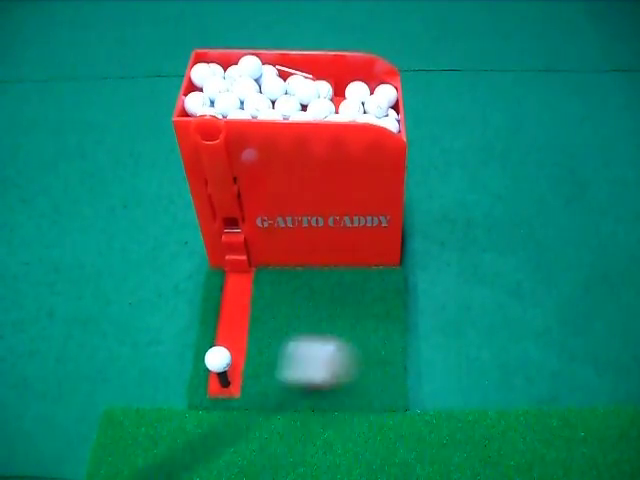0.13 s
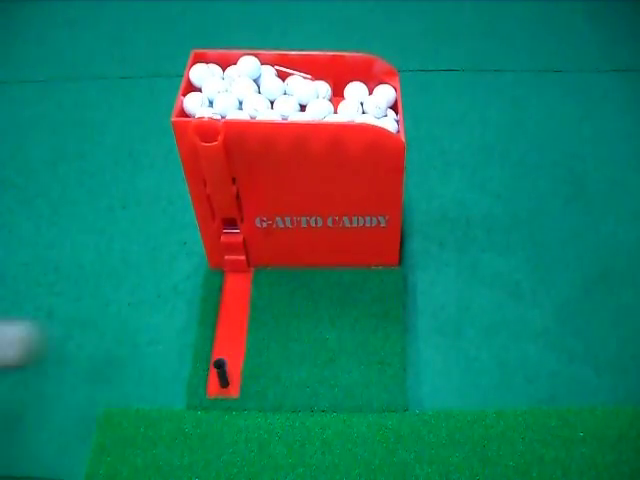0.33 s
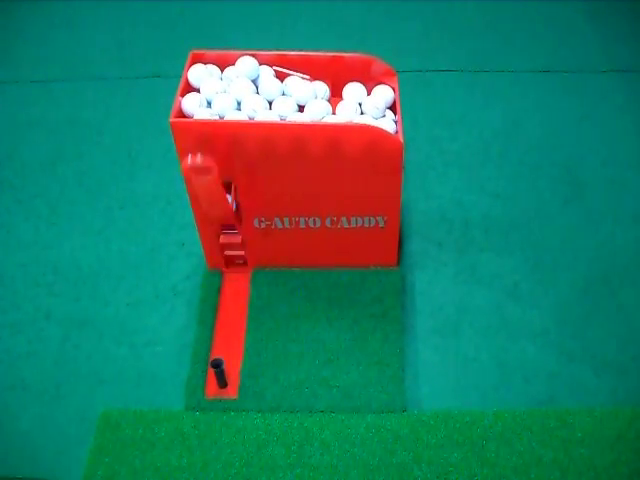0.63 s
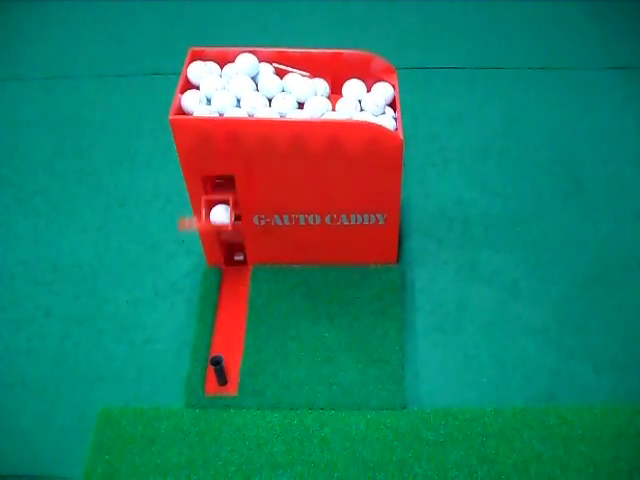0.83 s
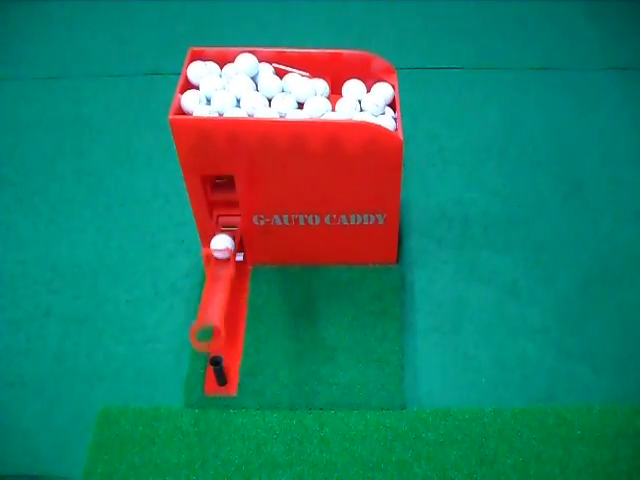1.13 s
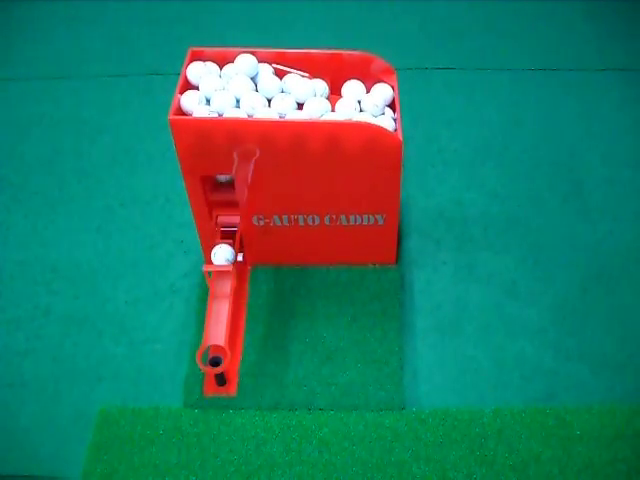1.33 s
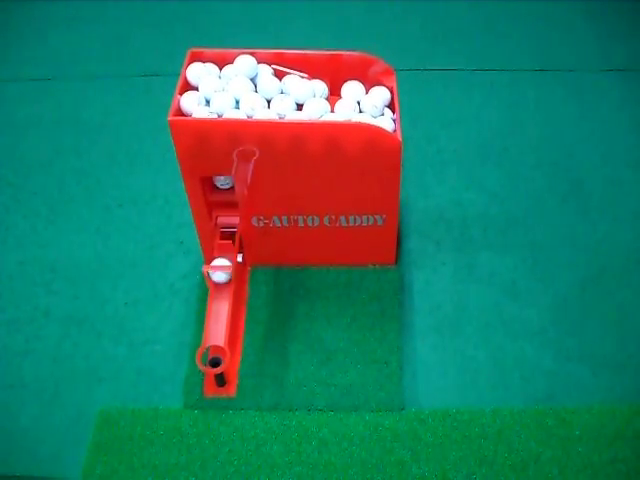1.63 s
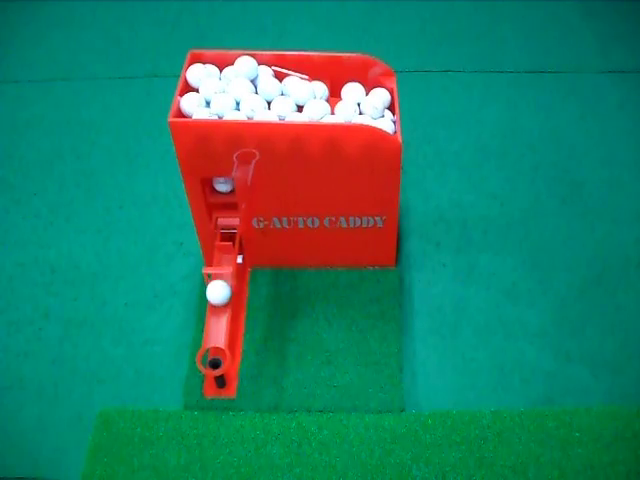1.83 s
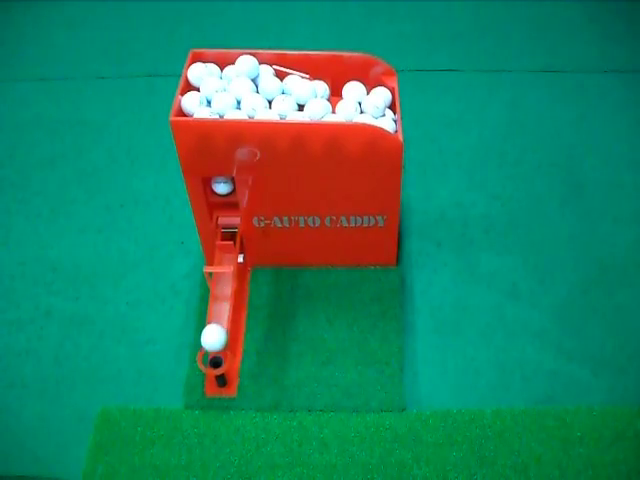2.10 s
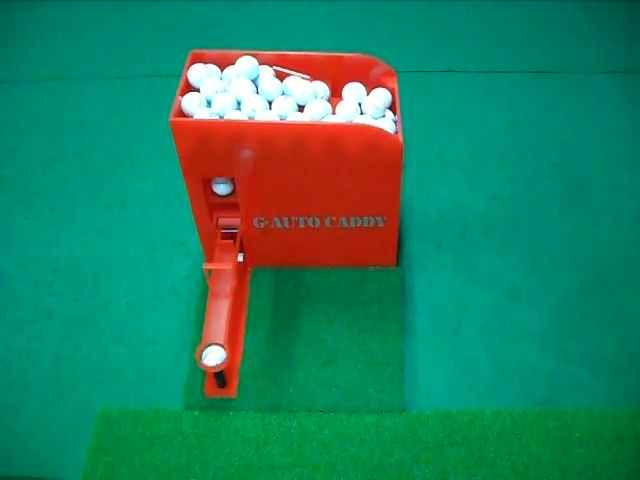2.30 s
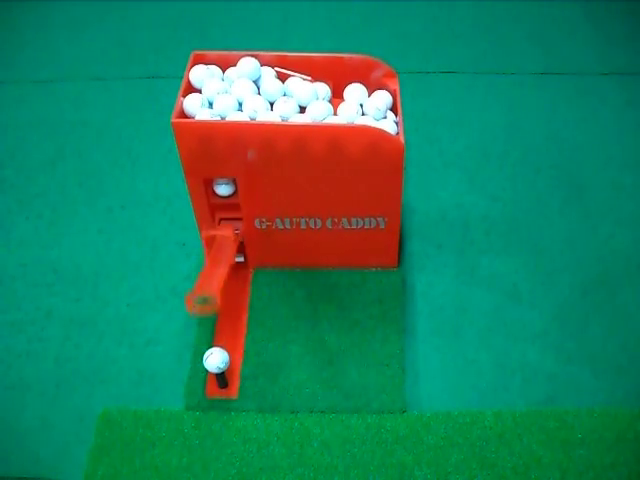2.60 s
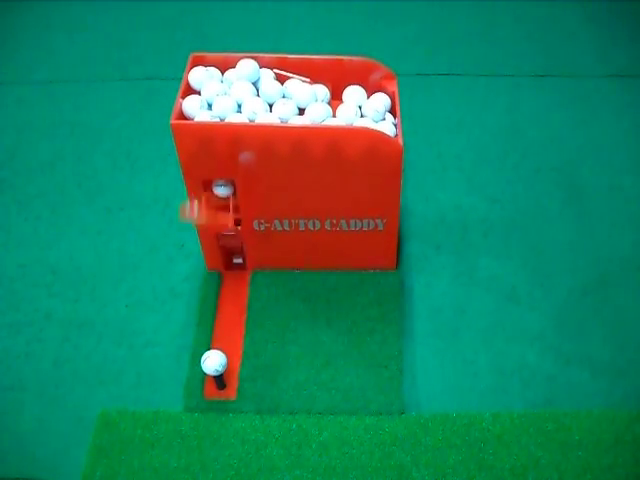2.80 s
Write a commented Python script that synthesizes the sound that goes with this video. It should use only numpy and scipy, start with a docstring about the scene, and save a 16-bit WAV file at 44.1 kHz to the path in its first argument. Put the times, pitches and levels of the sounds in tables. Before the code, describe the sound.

In an echoing practice bay, a metal driver hits a golf ball, which slaps dully into cloth. A dispenser's plastic arm unlatches and clatters down, a ball rolls and clicks onto the tee, and the arm knocks back.

```python
"""A reverberant golf practice bay. A metal driver cracks the ball off the tee, its hollow head pings,
and the ball thuds into a hanging screen. A plastic dispenser unlatches and lowers its arm; a ball
clatters in, rolls down and drops on the tee, and the arm swings back. The hollow housing booms
under the knocks. One sharp tick comes at the end, and faint air noise lies below it all."""
import sys
import numpy as np
from scipy import signal
from scipy.fft import rfft, irfft
from scipy.io import wavfile

SR = 44100
rng = np.random.default_rng(int(sys.argv[2]) if len(sys.argv) > 2 else 0)


def persist_wave(psi):
    """Save psi, clipped to +-1, as 16-bit WAV."""
    counts = np.round(np.clip(psi, -1, 1) * 32767).astype(np.int16)
    wavfile.write(sys.argv[1], SR, np.atleast_2d(counts).T)


N = 130095
T = np.arange(N) / SR


def club():
    """Metal on ball: a hard crack, its broader wash in the bay, and the ping of the hollow head."""
    # First touch, full hit, two near reflections. Each row: start in seconds, level in dB,
    # scatter in seconds.
    strikes = [(0.207, -46, 0.0089), (0.2098, -37.5, 0.015), (0.218, -43.5, 0.012), (0.235, -49, 0.045)]
    # The crack's colour towards the microphone, then into the bay. Each row: frequency in Hz, gain in dB.
    crack_colour = [(100, -24), (400, -25), (650, -5), (900, -3), (1250, 9), (1560, -2), (1850, 2.5),
                    (2250, -12), (2780, -27), (3250, -3), (3620, 5), (4080, -12), (4600, -5), (5500, -19),
                    (6400, 8), (7200, -22), (7700, -12), (8400, -3), (9000, -17), (12000, -20)]
    bay_colour = [(100, -10), (280, 0.5), (480, 0), (750, 2), (1200, 3.5), (1650, -1.5), (2250, -3),
                  (2780, -16), (3400, -3.5), (4050, -14.5), (4550, -10), (5500, -16), (6400, -3),
                  (7200, -16), (7720, -9), (8200, -13), (9000, -21), (12000, -23)]
    # The head's modes. Each row: pitch in Hz, level in dB, t60 in seconds.
    head_modes = [(1165, -46, .05), (3380, -59, .3), (3456, -58, .3), (3690, -56, .15), (5074, -47, .14),
                  (6308, -50, .45), (6344, -36, .11), (6349, -50, .38), (6565, -53, .12), (6830, -57, .16),
                  (7680, -56, .33)]
    full_hit = strikes[1]
    ping = ringing(head_modes, start=full_hit[0])
    thrown = blows([full_hit], bay_colour)
    wash = in_bay(thrown, wet_db=1.5) - thrown  # the tail alone
    return blows(strikes, crack_colour) + wash + in_bay(ping, wet_db=-12)


def screen():
    """Heavy cloth stops the ball, slaps dully and settles."""
    # The slaps. Each row: start in seconds, level in dB, scatter in seconds.
    thuds = [(0.4008, -32, 0.00033), (0.4102, -37.5, 0.0012), (0.4155, -38, 0.038), (0.4235, -40, 0.033),
             (0.4300, -40.5, 0.062), (0.4385, -39, 0.028), (0.4790, -44.5, 0.026)]
    # The cloth's colour. Each row: frequency in Hz, gain in dB.
    cloth_colour = [(40, -6), (120, -3), (200, 10.5), (290, -0.5), (460, 11.5), (680, 0), (1000, 1.5),
                    (1230, -6), (1450, -22.5), (2000, -22), (3000, -33), (8000, -66)]
    return in_bay(blows(thuds, cloth_colour), wet_db=-4.5)


def arm_knocks():
    """Each contact sets off the plastic's dense, short ring; harder contacts reach higher bands."""
    # Arm and ball knock together. Each row: start in seconds, then body, clack, snap and tick in dB.
    knocks = [(0.688, -56, -55, -60, -80), (0.728, -53.5, -63, -79, -84), (0.76, -54.5, -68, -79, -80),
              (1.134, -41.5, -41, -48, -58), (1.154, -45, -49, -57, -72), (1.179, -45.5, -53, -63, -82),
              (1.23, -42, -66, -63, -80), (1.336, -45.5, -65, -64, -76), (1.366, -45, -55, -67, -84),
              (1.3936, -37, -47, -50.5, -61), (1.427, -50, -48.5, -50.5, -57.5),
              (1.442, -34.5, -45, -52.5, -71), (1.463, -43, -48, -58, -74), (1.4873, -37, -42, -51.5, -72),
              (1.503, -63, -53, -63, -69), (1.534, -46.5, -64, -56.5, -68), (1.606, -65, -79, -76, -78),
              (1.647, -66, -74, -78, -82), (1.931, -56, -77, -63, -67), (2.197, -51, -49, -66, -76),
              (2.2255, -34, -40, -37.5, -59.5), (2.247, -41, -48, -50, -54), (2.268, -60, -65, -46, -56),
              (2.278, -44, -42, -41.5, -54), (2.301, -47, -45, -58, -59), (2.376, -45.5, -57, -65, -72),
              (2.464, -45, -46, -57, -69), (2.522, -43, -54, -59, -72), (2.5417, -33.5, -42, -51.5, -70),
              (2.56, -44, -51.5, -61, -77), (2.592, -37.5, -70, -61, -72), (2.622, -42.5, -51, -57, -76),
              (2.651, -42, -57.5, -72, -70), (2.679, -54, -63, -78, -80)]
    # Those four bands. Each row: low edge in Hz, high edge in Hz.
    bands = [(310, 780), (720, 1500), (1450, 4700), (4700, 10500)]
    # One value a band: attack in seconds, t60 in seconds, reverb send in dB.
    rise_s = [0.0032, 0.0026, 0.00095, 0.00022]
    t60_s = [0.086, 0.099, 0.052, 0.031]
    wet_db = [-6.5, -2.5, -6, -2.5]
    out = 0
    for k, band in enumerate(bands):
        force = sum(from_db(db[k]) * contact(T - start, rise_s[k], t60_s[k]) for start, *db in knocks)
        bandpass = np.vstack([signal.butter(2, band, "band", fs=SR, output="sos")] * 2)
        grain = rng.choice([-1., 1.], N)
        steady = arm_body(signal.sosfilt(bandpass, grain))  # only sets the band's gain
        struck = arm_body(signal.sosfilt(bandpass, grain * force + 1e-18))
        out = out + in_bay(struck / steady.std(), wet_db[k])
    return out


def arm_body(x):
    """Arm and chute resonate on top of what excites them."""
    # Their resonances. Each row: centre in Hz, width in Hz, added level in dB.
    modes = [(317.3, 25, 16.5), (403, 10, 3.5), (454, 12, -13), (518.5, 64, 1.5), (607, 7.2, 2.5),
             (770.5, 51, 2.5), (824, 17, -4.5), (931, 17, 4.5), (1027, 24, -6), (1127, 28, -9.5),
             (1561, 39, -1), (1760, 21, 7), (2450, 600, -4.5), (3230, 86, -1.5), (3830, 71, -4)]
    out = x
    for hz, width_hz, db in modes:
        resonator = signal.iirpeak(hz, hz / width_hz, fs=SR)
        out = out + from_db(db) * signal.lfilter(*resonator, x)
    return out


def housing():
    """The hollow box swells into its low note when knocked, with a short rumble round it."""
    # The booms. Each row: start in seconds, level in dB, pitch in Hz.
    booms = [(0.232, -56.5, 209.5), (0.409, -44, 205), (0.561, -56.5, 196), (0.600, -52, 199.5),
             (0.632, -55.5, 207), (0.669, -39.5, 204.8), (0.720, -48.5, 190), (0.751, -55, 185),
             (1.136, -34, 205.5), (1.174, -44, 218.5), (1.244, -49, 215), (1.336, -39, 209),
             (1.396, -46.5, 205), (1.451, -39, 191), (1.491, -40, 205), (1.606, -49.5, 203.5),
             (1.645, -61, 221), (1.868, -51, 219), (1.896, -50, 201), (1.958, -63, 215),
             (2.198, -49.5, 213), (2.228, -42.5, 215), (2.242, -34, 209), (2.383, -53.5, 208),
             (2.461, -49.5, 189), (2.527, -40.5, 206), (2.554, -39.5, 203.3), (2.644, -46, 215)]
    # The rumble's colour. Each row: frequency in Hz, gain in dB.
    rumble_colour = [(30, 5.5), (60, -6), (110, 4), (160, 8.5), (270, 11), (350, -1.5), (600, -46),
                     (2000, -56)]
    note_rise_s, rumble_rise_s, rumble_db = 0.01, 0.022, -12.5
    note, shake = 0, 0
    for start, db, hz in booms:
        t = np.maximum(T - start, 0)
        tone = np.sqrt(2) * np.sin(2 * np.pi * hz * t)
        note = note + from_db(db) * swell(t, note_rise_s) * tone
        shake = shake + from_db(db + rumble_db) * swell(t, rumble_rise_s)
    return in_bay(note + shake * noise(rumble_colour), wet_db=-12)


def tee_drop():
    """The hard ball drops through the ring and bounces on the tee with bright clicks."""
    # The bounces. Each row: start in seconds, level in dB, scatter in seconds.
    bounces = [(2.2258, -43.5, .025), (2.2788, -41, .035)]
    # Their colour. Each row: frequency in Hz, gain in dB.
    colour = [(500, -3), (1350, -13), (1520, 11), (1640, -1.5), (1800, 2), (2150, -11), (2650, 1.5),
              (2900, -6), (3200, 0.5), (3550, -8.5), (3870, -7), (4500, -12.5), (6000, -17), (11000, -34)]
    return in_bay(blows(bounces, colour), wet_db=-0.5)


def latch():
    """The catch lets the arm go: small bright clicks, each with a short plastic ring."""
    # The clicks. Each row: start in seconds, level in dB.
    releases = [(0.666, -54.5), (0.696, -61), (0.717, -66.5)]
    # Their colour. Each row: frequency in Hz, gain in dB.
    colour = [(400, -19), (1250, -8), (1580, 14), (1950, -11), (2800, -7), (3150, -5), (3500, -2),
              (4000, 2), (4350, -2), (4750, -2), (5600, -9), (8000, -11), (11000, -24)]
    # The catch's ring. Each row: pitch in Hz, level in dB relative to the click, t60 in seconds.
    modes = [(1600, -3, 0.083), (3160, -9, .08), (3990, -3.5, 0.045), (4750, -9, 0.1)]
    scatter_s = 0.032
    clicks = blows([(start, db, scatter_s) for start, db in releases], colour)
    ring = sum(from_db(db) * ringing(modes, start) for start, db in releases)
    return in_bay(clicks + ring, wet_db=-4.5)


def ball_roll():
    """The ball rolls down the arm, heard through the housing."""
    # The roll's fader curve. Each row: time in seconds, level in dB.
    levels = [(1.5, -79), (1.69, -80), (1.73, -59), (1.83, -63), (1.93, -58.5), (2.05, -57.5), (2.12, -58),
              (2.21, -54.5), (2.25, -54)]
    # Its colour. Each row: frequency in Hz, gain in dB.
    colour = [(60, -27), (165, -7), (215, 7.5), (270, -6.5), (450, -9.5), (900, -18), (1600, -27),
              (4000, -41)]
    return fader(levels) * noise(colour)


def arm_swing():
    """The housing shudders as the arm swings down."""
    # The shudder's fader curve. Each row: time in seconds, level in dB.
    levels = [(0.4, -82), (0.5, -47.5), (0.62, -74.5), (0.8, -55), (0.95, -69.5), (1.27, -62),
              (1.325, -51.5), (1.40, -64)]
    # Its colour. Each row: frequency in Hz, gain in dB.
    colour = [(25, -5), (50, -29.5), (76, -1), (110, -11), (180, -17.5), (400, -28.5), (1500, -53)]
    return fader(levels) * noise(colour)


def lone_tick():
    """One sharp, dry tick."""
    # Its one row: start in seconds, level in dB, scatter in seconds.
    tick = [(2.937, -48, 0.03)]
    # Its colour. Each row: frequency in Hz, gain in dB.
    colour = [(200, -3), (800, -14.5), (1600, -18), (2600, -3), (3500, -17.5), (5000, -8.5), (6700, -3),
              (8000, -21), (12000, -19)]
    return blows(tick, colour)


def air():
    """A faint, steady bed of air and hiss."""
    # Its colour. Each row: frequency in Hz, gain in dB.
    colour = [(12, -37), (20, 3), (91, -3.5), (135, -11.5), (282, -18), (764, -17.5), (826, -17.5),
              (894, -19.5), (2360, -22), (2760, -23.5), (4310, -25.5), (10500, -28.5), (13600, -31.5),
              (22000, -120)]
    return from_db(-63.5) * noise(colour)


def in_bay(x, wet_db):
    """The direct sound plus a diffuse tail whose treble dies first."""
    # The bay's decay. Each row: frequency in Hz, t60 in seconds.
    decay_times = [(100, 0.78), (400, 0.56), (1100, 0.69), (2800, 0.7), (7000, 0.52), (11000, 0.41)]
    predelay_s, build_s = 0.002, 0.011
    t, hz = T[:SR], np.arange(SR // 2 + 1)
    white = rfft(rng.standard_normal(SR))
    edges = np.r_[0, np.geomspace(130, 16000, 22)]
    build = 1 - np.exp(-np.maximum(t - predelay_s, 0) / build_s)
    tail = 0
    for low, high in zip(edges, edges[1:]):
        t60 = at_hz(decay_times, (low + high) / 2)
        band = irfft(white * (hz >= low) * (hz < high), SR) * build * decay(t, t60)
        tail = tail + band / np.linalg.norm(band) * np.sqrt(2 * (high - low) / SR)  # equal energy per Hz
    return x + from_db(wet_db) * signal.fftconvolve(x, tail)[:N]


def blows(rows, colour):
    """One coloured pulse a row, smeared by four allpass echoes; its level is the rms over 10 ms."""
    clicks = np.zeros(N + SR)
    for start, db, scatter_s in rows:
        burst = signal.unit_impulse(4096)
        echo_lags = (rng.uniform(.006, .034, 4) * scatter_s * SR).astype(int)
        for lag in echo_lags[echo_lags > 0]:
            loop = np.r_[1, np.zeros(lag - 1), -.6]
            burst = signal.lfilter(loop[::-1], loop, burst)
        at = int(start * SR)
        clicks[at:at + len(burst)] += from_db(db) * np.sqrt(SR / 100) * burst
    return signal.fftconvolve(clicks, pulse(colour))[:N]


def pulse(colour, size=8192):
    """The tightest causal pulse of this colour (minimum phase), with unit energy."""
    cepstrum = irfft(np.log(eq_curve(colour, size)))
    cepstrum[1:size // 2] *= 2
    cepstrum[size // 2 + 1:] = 0
    shape = irfft(np.exp(rfft(cepstrum)))
    return shape / np.linalg.norm(shape)


def noise(colour):
    """Steady noise of this colour, at unit rms."""
    x = irfft(rfft(rng.standard_normal(N)) * eq_curve(colour, N), N)
    return x / np.sqrt(np.mean(x ** 2))


def ringing(modes, start):
    """Decaying sines set off at one moment."""
    t = T - start
    return sum(from_db(db) * np.sin(2 * np.pi * hz * t) * decay(t, t60) for hz, db, t60 in modes)


def contact(t, rise_s, t60):
    """A quick attack, then decay."""
    return (1 - np.exp(-np.maximum(t, 0) / rise_s)) * decay(t, t60)


def swell(t, rise_s):
    """A rounded envelope that peaks at rise_s."""
    return t / rise_s * np.exp(1 - t / rise_s)


def decay(t, t60):
    """Starts at t = 0 and falls 60 dB in t60 seconds."""
    return (t >= 0) * np.exp(-np.log(1000) * np.maximum(t, 0) / t60)


def fader(levels):
    """Gain that rides through the given points and is shut outside them."""
    times, db = np.transpose(levels)
    return from_db(np.interp(T, times, db, left=-120, right=-120))


def eq_curve(colour, size):
    """A colour as one gain for each FFT bin."""
    return from_db(at_hz(colour, np.fft.rfftfreq(size, 1 / SR)))


def at_hz(points, hz):
    """Read a table on a log-frequency axis."""
    freqs, values = np.transpose(points)
    return np.interp(np.log(np.maximum(hz, 1)), np.log(freqs), values)


def from_db(db):
    """Decibels to gain."""
    return 10 ** (np.asarray(db) / 20)


def scene():
    """Strike, screen and the dispenser's cycle over still air, in mono."""
    dispenser = latch() + arm_knocks() + housing() + tee_drop() + ball_roll() + arm_swing()
    return (club() + screen() + dispenser + lone_tick() + air())[None]


def record(dry):
    """A small microphone whose top falls away, then a steep cut."""
    mic_top_hz, cutoff_hz = 10220, 12064
    soft = signal.sosfilt(signal.butter(12, mic_top_hz, fs=SR, output="sos"), dry)
    return signal.sosfilt(signal.ellip(10, .1, 80, cutoff_hz, fs=SR, output="sos"), soft)


dry = scene()
out = record(dry)
persist_wave(out)
```